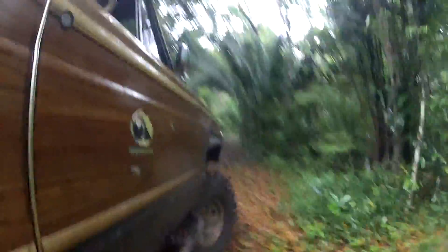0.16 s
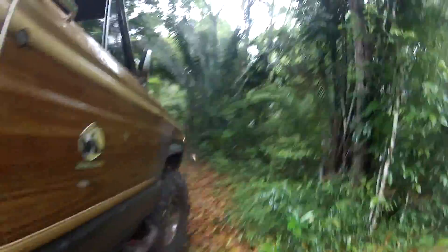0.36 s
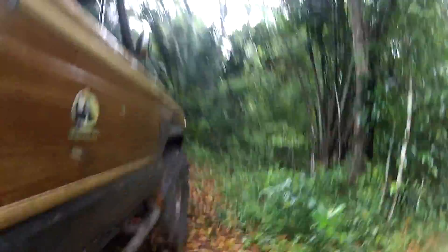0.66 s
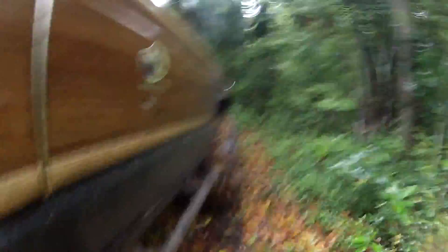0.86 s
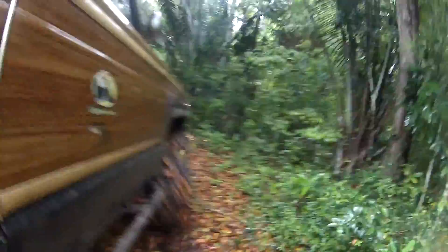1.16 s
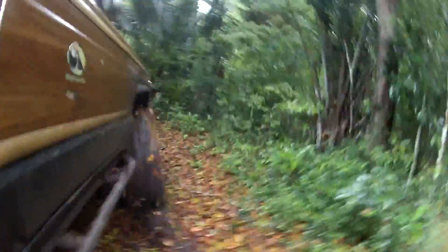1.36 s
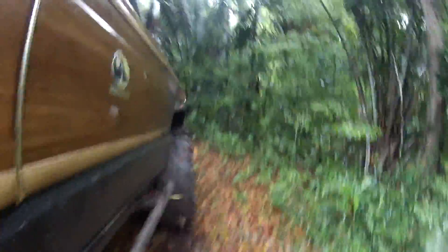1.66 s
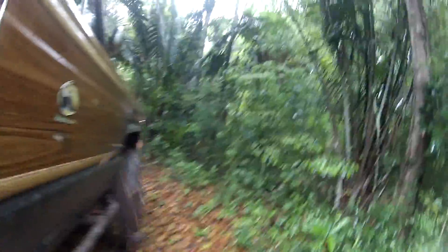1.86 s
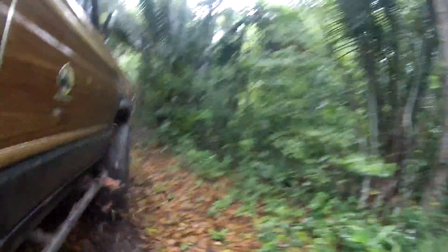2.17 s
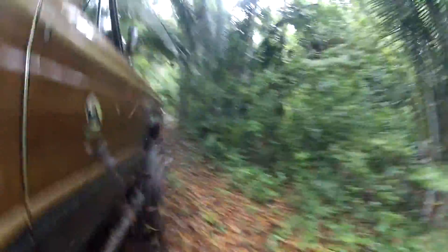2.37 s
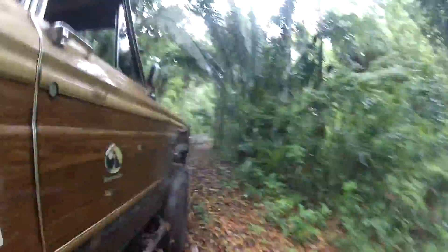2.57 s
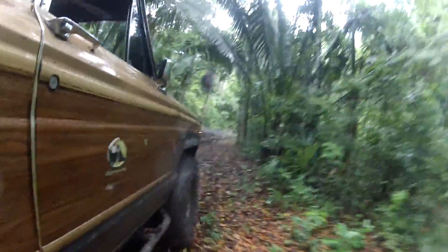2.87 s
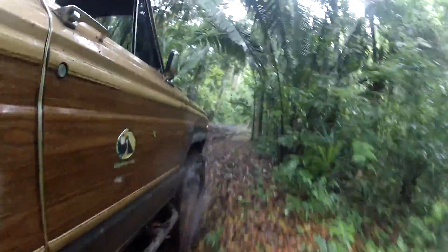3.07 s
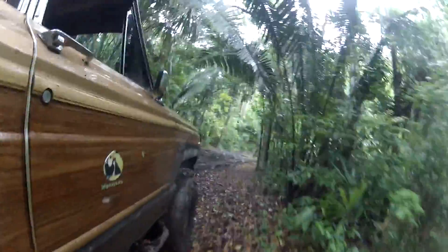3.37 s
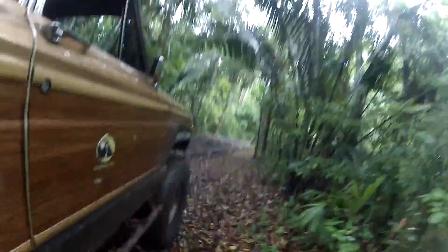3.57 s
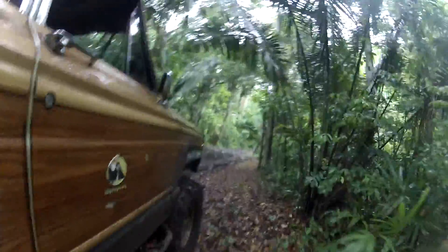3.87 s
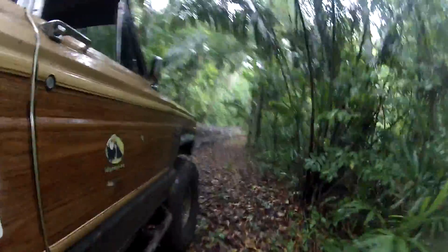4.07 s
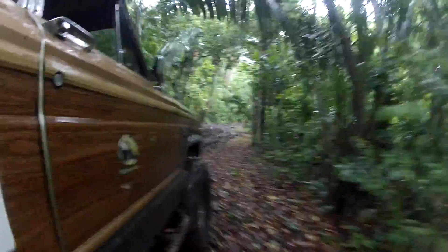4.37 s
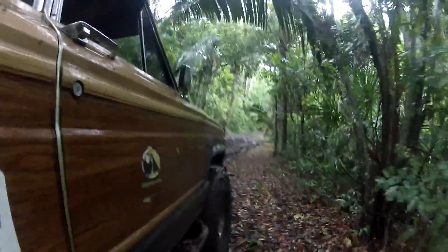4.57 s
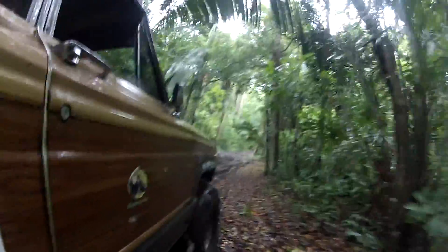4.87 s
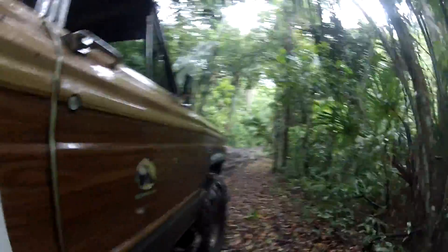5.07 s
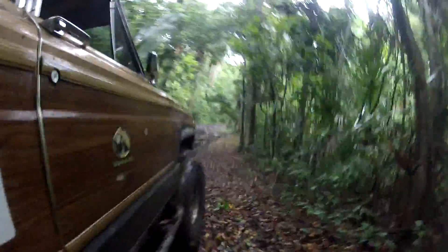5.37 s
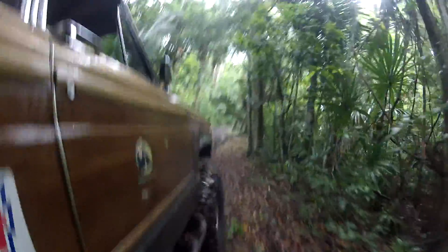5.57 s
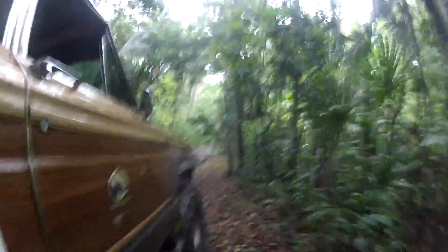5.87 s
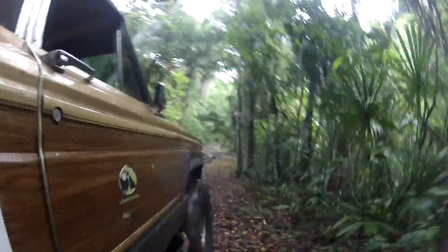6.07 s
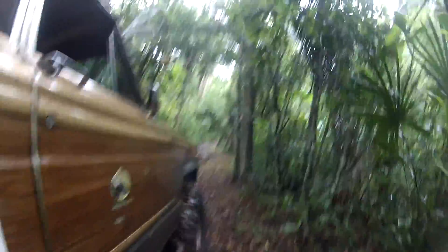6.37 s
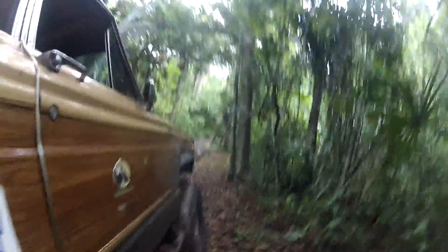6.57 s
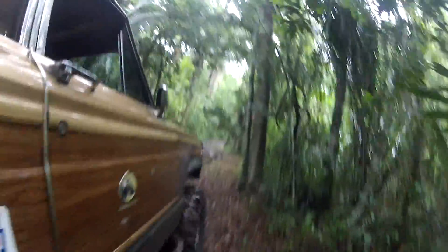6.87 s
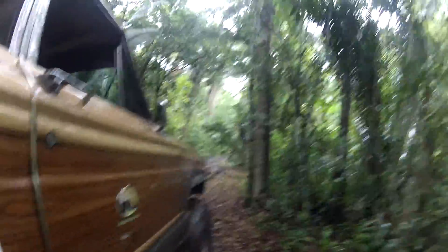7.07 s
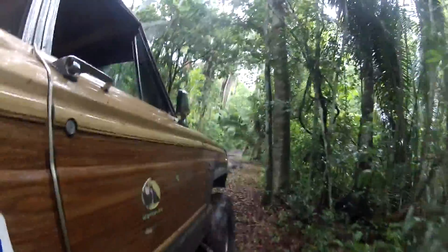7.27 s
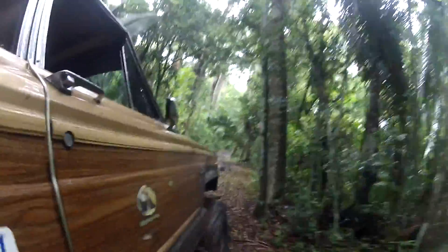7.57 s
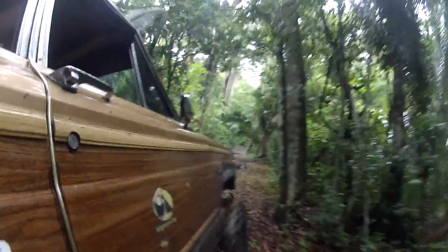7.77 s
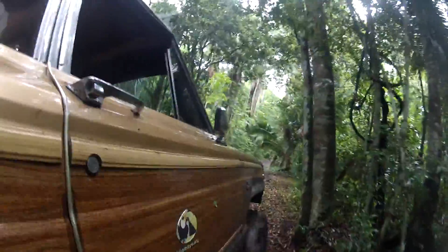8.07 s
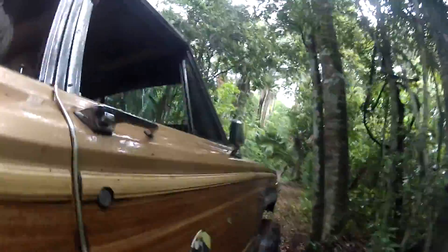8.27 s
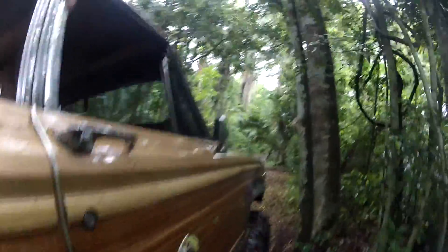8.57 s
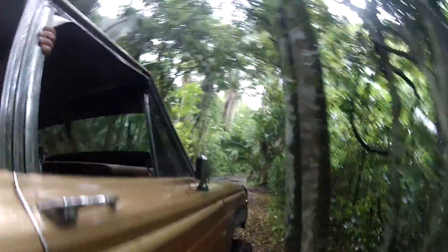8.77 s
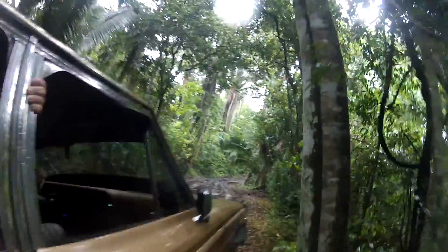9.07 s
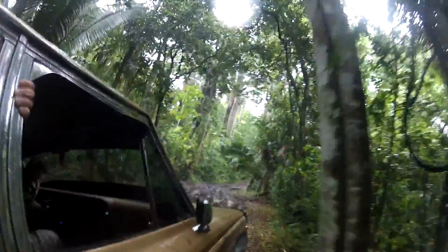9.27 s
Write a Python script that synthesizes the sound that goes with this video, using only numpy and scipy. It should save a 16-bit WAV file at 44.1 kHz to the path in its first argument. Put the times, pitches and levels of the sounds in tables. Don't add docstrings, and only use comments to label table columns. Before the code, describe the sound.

An eight-cylinder engine falls off its revs, growls up in a long loud pull, sags, blips again briefly, sags and then burbles evenly at low speed until the end. Exhaust pulses thump and knock, engine tones sing when pulling, valves chatter. Small sharp taps and heavy bumps hit the body, and ruts make the chassis rumble swell. Outdoors, close, mono, with coarse treble from a small camera.

```python
import sys
import numpy as np
from scipy import signal
from scipy.fft import rfft, irfft, next_fast_len
from scipy.io import wavfile
from scipy.ndimage import uniform_filter1d, map_coordinates

SR = 44100
rng = np.random.default_rng(int(sys.argv[2]) if len(sys.argv) > 2 else 0)


def level_to_linear(level):
    exponent = np.asarray(level, float) / 20
    return 10 ** exponent


def wav_record(signal):
    frames = np.transpose(np.atleast_2d(signal))
    bounded = np.clip(frames, -1, 1)
    quanta = np.round(bounded * 32767).astype(np.int16)
    wavfile.write(sys.argv[1], SR, quanta)


N = 415863

# time in seconds, firings per second in Hz.
FIRING_RATE = [(0.0, 127.89), (0.346, 94.89), (0.873, 62.68), (1.164, 110.37), (2.063, 135.4),
               (2.457, 136.47), (2.672, 103.62), (3.034, 107.97), (3.196, 57.77), (3.429, 109.35),
               (3.697, 113.48), (3.879, 65.26), (3.996, 63.26), (4.297, 78.18), (6.941, 77.91),
               (7.255, 76.7), (8.3, 75.32), (9.43, 77.03)]
# time in seconds, opening from 0 to 1.
THROTTLE = [(0, 0.81), (.12, 0.78), (.36, 0.01), (.82, 0.15), (.94, 0.89), (1.025, 0.65), (1.15, 0.89),
            (2.44, 0.92), (2.6, 0.53), (2.93, 0.96), (3.0, 0.74), (3.15, 0.17), (3.25, 0.73), (3.46, 0.94),
            (3.66, 0.85), (3.86, 0.29), (4.04, 0.71), (4.36, 0.53)]
# thump and knock times in firing steps,
# then thump, knock and bark levels in dB.
CRAWL_BEATS = [(-0.25, -0.53, 1.5, -2.3, -30.5), (0.54, 0.2, 0.4, 7.7, -5.3), (1.78, 1.4, -1.3, 4.0, -30.5),
               (2.4, 2.05, -1.9, 4.0, -7.3), (3.76, 3.47, 3.4, 6.1, -30.5), (4.37, 4.01, 5.2, 9.5, -30.5),
               (5.81, 5.43, 4.7, 8.4, -30.5), (6.37, 6.13, -3.4, 3.0, -2.2)]
PULL_BEATS = [(.42, .47, -4.3, -6, 6.5), (1.02, 1.21, -12, -4, 2), (1.22, 2.2, 4.9, 7, -30),
              (3.59, 3, 8.1, 5, -.2), (3.46, 4.51, 6.3, 1, 9.5), (3.82, 5.06, -2.8, 3, -2.1),
              (6.22, 6.76, 4.5, -8, -1.7), (6.06, 6.95, -10.4, -5, 4.8)]
MANIFOLD_MS = [0, 3.2, 0, 4.87, 0, 6.32, 0, 4.86]
# time in firing steps, level in dB.
POPS = [(.6, -9), (1.4, -2), (2.6, -3), (3.7, -10), (4.52, -1), (5.68, -5), (6.4, -7), (7.52, 0)]
# centre in Hz, width in Hz, level in dB.
SILENCER_MODES = [(168, 48, -12), (306, 76, -.8), (313, 63, -.2), (368, 36, -18)]
# centre in Hz, width in Hz, level in dB.
DRONE_MODES = [(187.4, 14.4, -2.5), (281.8, 20, -9)]
# centre in Hz, width in Hz, level in dB.
PIPE_MODES = [(72, 19, -6.4), (100, 12, 5)]
# centre in Hz, width in Hz, level in dB.
TAIL_MODES = [(394, 89, -0.5), (470, 11, -6), (559, 10.3, 15.5), (639.6, 20, 14.5), (735, 39, 10),
              (866, 24, 9.5), (953, 26, 8)]
# opening from 0 to 1, then thump, knock and bark levels in dB.
BREATH = [
    (0, -52.5, -61.5, -79),
    (.4, -42.5, -42, -65.5),
    (0.702, -38.5, -45.5, -46),
    (1, -36, -38, -33.5),
]
# firing rate in Hz, width in Hz, thump gain in dB, knock gain in dB.
PIPE_BOOM = (106, 9.4, 5.2, 2.6)
# multiple of the firing rate, level against the knock in dB.
SUNG_ORDERS = [(2, -5), (2.5, -3.5), (3, -8.5), (3.5, -14), (4.25, -11), (4.75, -15.5), (5.5, -16)]
# time in firing steps, level in dB.
VALVE_CLOSINGS = [(.05, 13), (1.2, 12.5), (2.2, 10), (3.2, 14), (4.2, 17), (5.2, 12), (6, 7), (7.1, 15)]
# frequency in Hz, spectral density in dB per Hz.
CASE_COLOUR = [(560, -7), (950, -9.5), (1140, -18.5), (1230, -11), (1530, -11), (1710, -13), (2240, 1.5),
               (2310, -2), (2770, -11.5), (2990, -15), (3180, -18.5), (4250, -12.5), (4690, -18),
               (5220, -12), (5900, -19.5), (7670, -27), (13000, -120)]
# time in seconds, gain in dB.
DRIFT = [(0, 0.5), (.7, 5.5), (1.25, 1.5), (2.9, 0.5), (3.2, 5), (3.5, 0), (7.6, -.5), (8.6, -2),
         (9.43, -2)]
# start in seconds, peak in dB, ring in Hz, crack and dull knock in dB.
TAPS = [(0.0962, -32.5, 2240, -12, 6), (0.3561, -44.5, 2630, 11.5, -10), (0.6905, -50, 2560, 21.5, -6),
        (0.831, -36, 1950, -3, -5), (1.006, -29.5, 2060, -18, -10), (1.6623, -16.5, 2230, 9, -15),
        (4.117, -38, 2170, -9, -1), (6.692, -35.5, 1820, -17, -5), (7.1242, -35.5, 2330, -2, -25),
        (8.1454, -48.5, 2230, 6, 3), (8.4555, -39, 2146, -18, -18), (8.507, -45, 2180, -8, -12),
        (8.6203, -48, 2570, -8, -4), (8.7598, -34, 2420, -9, 1), (8.8834, -33.5, 2550, -5.5, -7)]
# start in seconds, peak in dB, panel frequency in Hz.
BUMPS = [(0.052, -13, 118), (0.094, -6, 78), (0.277, -17, 87), (0.705, -15, 99), (0.779, -14, 80),
         (0.83, -25, 79), (0.922, -12, 78), (2.424, -6, 116), (5.977, -18, 103), (6.694, -11.5, 105),
         (8.76, -8, 92), (8.905, -23, 88.5)]
# frequency in Hz, spectral density in dB per Hz.
ROAD_COLOUR = [(15, -5), (32, -4.5), (55, -7), (100, -3.5), (200, -91)]
# time in seconds, rumble swell in dB.
RUTS = [(.17, -2), (.8, 8), (1.0, 7.5), (2.05, 4.5), (2.3, 10.5), (3.6, 2), (4.05, 11), (4.35, 5),
        (5.38, 4), (5.7, 3), (6.15, 6), (6.62, 9.5), (7.59, 4), (8.5, 9), (8.77, 5)]

FLYWHEEL_S, CRAWL_HZ = .08, 78
LABOUR_DB_PER_100HZ_S, STALL_DB_PER_OCTAVE, KNOCK_DB_PER_OCTAVE = 2.5, 14, 6.5
SING_DB_PER_OCTAVE, OVERRUN_DB = 23, -51
CLATTER_DB, CLATTER_DB_PER_OCTAVE, CLATTER_LOAD_DB = -55.5, 9.5, 4
RUT_S, FAST_DB, SLOW_DB, BRAKE_S = 0.084, -41.5, -47.5, 2.6
HOLD_HZ, TOP_HZ = 12000, 15050


def unit(x):
    return x / np.sqrt(np.mean(x ** 2) + 1e-20)


def steady(x):
    power = np.abs(uniform_filter1d(x ** 2, size=SR // 6))
    return x / np.sqrt(power + 1e-12)


def curves(rows):
    s, *columns = np.transpose(rows)
    return [np.interp(np.arange(N) / SR, s, column) for column in columns]


def wobble(rate):
    knots = rng.standard_normal(int(N * rate / SR) + 4)
    return map_coordinates(knots, [np.arange(N) * rate / SR])


def filtered(x, response):
    m = next_fast_len(N + SR // 2)
    return irfft(rfft(x, m) * response(np.fft.rfftfreq(m, 1 / SR)), m)[:N]


def colour(points):
    f, db = np.transpose(points)
    return lambda hz: level_to_linear(np.interp(np.log(hz + 1), np.log(f), db, right=-120))


def modes(rows, turn=-1):
    def response(f):
        total = 0
        for k, (centre, width, db) in enumerate(rows):
            damping = 1j * f * width
            total = total + turn ** k * level_to_linear(db) * damping / (centre * centre - f * f + damping)
        return total
    return response


def speed():
    return uniform_filter1d(curves(FIRING_RATE)[0], size=round(FLYWHEEL_S * SR), mode="nearest")


def effort():
    throttle, hz, drift_db = curves(THROTTLE)[0], speed(), curves(DRIFT)[0]
    opening, *laws = np.transpose(BREATH)
    thump_db, knock_db, bark_db = [np.interp(throttle, opening, law) for law in laws]
    boom_hz, boom_width, boom_thump_db, boom_knock_db = PIPE_BOOM
    boom = 1 / (1 + (2 * (hz - boom_hz) / boom_width) ** 2 / 4)
    octaves = np.log2(hz / CRAWL_HZ)
    labour = np.maximum(np.gradient(hz) * SR / 100, 0) * np.clip((hz - 70) / 12, 0, 1)
    slope = np.where(octaves < 0, STALL_DB_PER_OCTAVE, KNOCK_DB_PER_OCTAVE)
    thump_db = thump_db + boom_thump_db * boom + LABOUR_DB_PER_100HZ_S * labour
    knock_db = knock_db + boom_knock_db * boom * labour + slope * octaves
    clatter_db = CLATTER_DB + CLATTER_DB_PER_OCTAVE * octaves + CLATTER_LOAD_DB * throttle + drift_db
    away_db = np.minimum(drift_db, 0)
    return thump_db + away_db, knock_db + away_db, bark_db + away_db, clatter_db


def beats(steps, sizes_db, scatter_db, jitter, lag_ms=0):
    crank = np.cumsum(speed()) / SR
    at = np.arange(-1, crank[-1] // 8 + 1)[:, None] * 8 + np.asarray(steps)
    chance = rng.standard_normal((2,) + at.shape)
    at = at + jitter * chance[0]
    size = level_to_linear(np.asarray(sizes_db) + scatter_db * chance[1]) * (at > 0) * (at < crank[-1])
    sample = np.interp(at, crank, np.arange(N)) + np.asarray(lag_ms) * SR / 1000
    return np.bincount(sample.astype(int).ravel(), size.ravel(), N + SR)[:N]


def firing_train(load, time_column, level_column):
    crawl, pull = np.transpose(CRAWL_BEATS), np.transpose(PULL_BEATS)
    light = beats(crawl[time_column], crawl[level_column], 1, .01, MANIFOLD_MS)
    heavy = beats(pull[time_column], pull[level_column], 1, .01, MANIFOLD_MS)
    return (1 - load) * light + load * heavy


def pipe_thump(load):
    hz = speed()
    thump = steady(filtered(firing_train(load, 0, 2), modes(PIPE_MODES)))
    gathering = np.clip(np.gradient(hz) * SR / 100, 0, 2)
    near_stall = hz < 70
    hum = .3 + .7 * load + .6 * gathering + .5 * near_stall
    return thump + hum * np.cos(2 * np.pi * np.cumsum(hz) / SR)


def silencer_knock(load):
    knock = firing_train(load, 1, 3)
    return filtered(knock, modes(SILENCER_MODES)) + filtered(load * knock, modes(DRONE_MODES))


def tail_bark(load, bark_db):
    pops = beats(*np.transpose(POPS), 2, .01, lag_ms=2)
    crack = (1 - load) * firing_train(load, 1, 4) + load * pops
    rush = filtered(crack, lambda hz: 1 / (1 + 1j * hz / 25)) * rng.standard_normal(N)
    bark = steady(filtered(crack, modes(TAIL_MODES, turn=1)))
    bark = bark + (.8 - .45 * load) * steady(filtered(rush, modes(TAIL_MODES)))
    snap = steady(filtered(crack, modes([(860, 260, 0)])))
    bark = bark + .5 * load * level_to_linear(3 * wobble(12)) * snap
    bark = filtered(bark, lambda hz: 1 / (1 + 1.4j * hz / 1050 - (hz / 1050) ** 2) ** 2)
    push = steady(filtered(crack, modes([(330, 420, 0)])))
    return bark + .3 * load * push * (bark_db < 0)


def exhaust():
    thump_db, knock_db, bark_db, _ = effort()
    load = np.clip((bark_db + 53) / 6, 0, 1)
    thump = level_to_linear(thump_db) * steady(pipe_thump(load))
    knock = level_to_linear(knock_db) * steady(silencer_knock(load))
    return thump + knock + level_to_linear(bark_db) * steady(tail_bark(load, bark_db))


def singing():
    hz = speed()
    crank, throttle = np.cumsum(hz) / SR, np.clip(curves(THROTTLE)[0], 0, 1)
    lines = 0
    for multiple, db in SUNG_ORDERS:
        multiple = np.round(multiple * 8) / 8
        level = level_to_linear(db + 1.05 * wobble(7.25))
        lines = lines + level * np.cos(2 * np.pi * multiple * crank + 0.89 * wobble(4.6))
    pulling = throttle ** 2 * level_to_linear(effort()[1] + SING_DB_PER_OCTAVE * np.log2(hz / 135))
    coasting = (1 - throttle) ** 3 * np.clip((hz - 72) / 12, 0, 1)
    overrun = level_to_linear(OVERRUN_DB + 4 * wobble(15)) * coasting * np.cos(4 * np.pi * crank)
    return pulling * lines + overrun


def valves():
    closings = beats(*np.transpose(VALVE_CLOSINGS), scatter_db=3, jitter=0.062)
    swell = unit(filtered(closings, lambda hz: 1 / (1 + 1j * hz / 30) / (1 + 1j * hz / 120)))
    hiss = (1 + .4 * swell) * level_to_linear(1.2 * wobble(14)) * rng.standard_normal(N)
    chirp = filtered(swell ** 2 * rng.standard_normal(N), modes([(2230, 210, -17.0), (2630, 18, -12)]))
    clatter = steady(unit(filtered(hiss, colour(CASE_COLOUR))) + 0.26 * unit(chirp))
    return level_to_linear(np.maximum(effort()[3], -57.5) + 1.5) * clatter


def body():
    out, t = np.zeros(N + SR), np.arange(SR // 8) / SR
    for s, db, hz, crack_db, dull_db in TAPS:
        ring = np.sin(2 * np.pi * hz * t) * level_to_linear(-60 * t / 0.015)
        crack = rng.standard_normal(len(t)) * (level_to_linear(-60 * t / .008) + .12 * level_to_linear(-60 * t / .03))
        dull = np.sin(2 * np.pi * 950 * t) * level_to_linear(-60 * t / 0.011)
        dull = dull + np.sin(2 * np.pi * 330 * t) * level_to_linear(-60 * t / 0.061)
        tap = ring + level_to_linear(crack_db) * crack + level_to_linear(dull_db) * dull
        onset = 1 - np.exp(-t / .0002)
        out[round(s * SR):][:len(t)] += level_to_linear(db + 3) * tap * onset
    for s, db, hz in BUMPS:
        swing = np.sin(2 * np.pi * hz * t) * (t / 0.01) * np.exp(1 - t / 0.0065)
        out[round(s * SR):][:len(t)] += level_to_linear(db - 10) * swing
    return out[:N]


def rumble_db():
    t = np.arange(N) / SR
    rolling_db = SLOW_DB + (FAST_DB - SLOW_DB) / (1 + np.exp((t - BRAKE_S) / .05))
    return rolling_db + sum(db * np.exp(-((t - s) / RUT_S) ** 2) for s, db in RUTS)


def road():
    lumps = level_to_linear(2 * wobble(9))
    rumble = unit(lumps * filtered(rng.standard_normal(N), colour(ROAD_COLOUR)))
    roar_colour = colour([(60, -68), (120, 6.0), (350, 2.0), (500, -2.5), (1100, -36.0)])
    rolling = unit(filtered(rng.standard_normal(N), roar_colour))
    return level_to_linear(rumble_db()) * rumble + level_to_linear(-57) * rolling


def scene():
    return (exhaust() + singing() + valves() + body() + road())[None]


def thinned(x, floor_db):
    hz, _, z = signal.stft(x, SR, nperseg=2048)
    band = uniform_filter1d(np.abs(z) ** 2, size=12, axis=0)
    keep = (band > level_to_linear(2 * floor_db)) | (hz[:, None] < 4000)
    return signal.istft(z * keep, SR, nperseg=2048)[1][:N]


def top_cut(x):
    return signal.sosfilt(signal.butter(12, 16480, fs=SR, output="sos"), x)


def record(dry):
    base = filtered(dry[0], lambda hz: 1 / np.sqrt(1 + (hz / 5650) ** 50))
    sampled = base * (1 + 2 * np.cos(2 * np.pi * HOLD_HZ * np.arange(N) / SR))
    held = filtered(sampled, lambda hz: np.sinc(hz / HOLD_HZ) * np.where(hz < TOP_HZ, 1, level_to_linear(-19)))
    return top_cut(thinned(held, floor_db=-99)[None])


dry = scene()
out = record(dry)
wav_record(out)
```